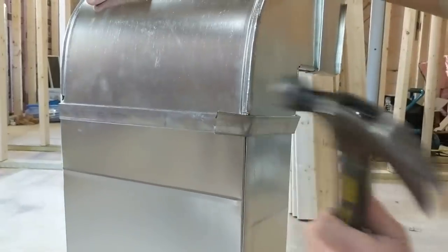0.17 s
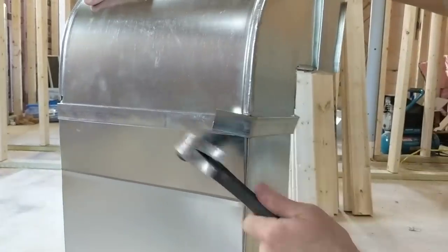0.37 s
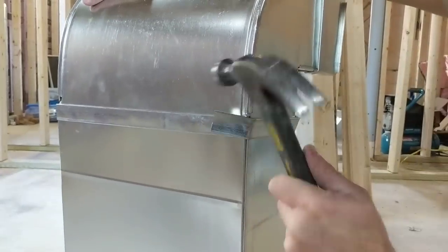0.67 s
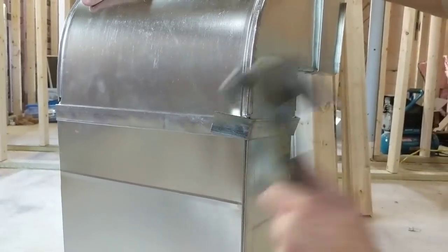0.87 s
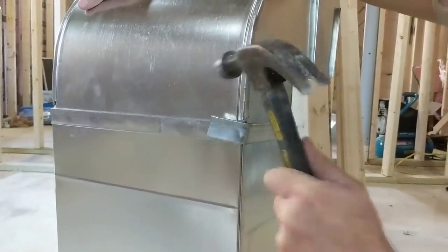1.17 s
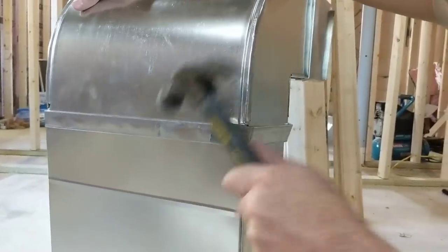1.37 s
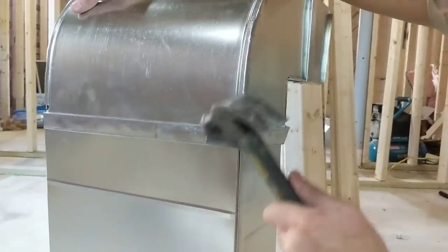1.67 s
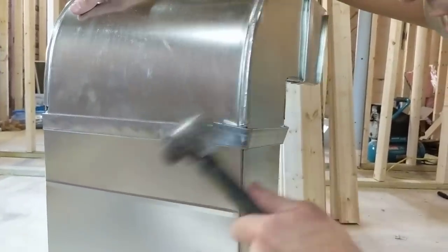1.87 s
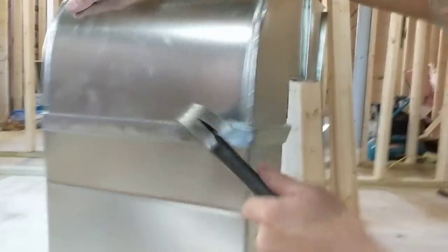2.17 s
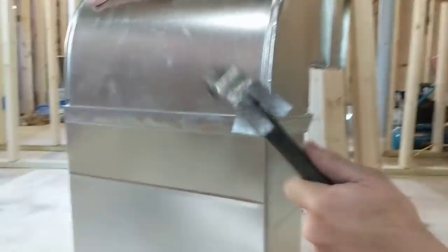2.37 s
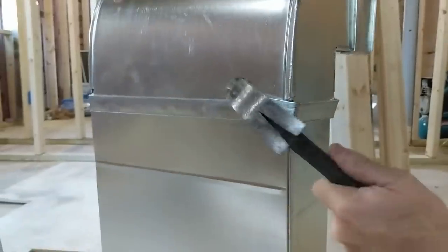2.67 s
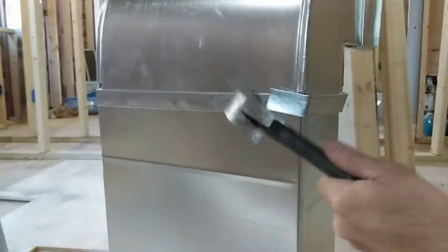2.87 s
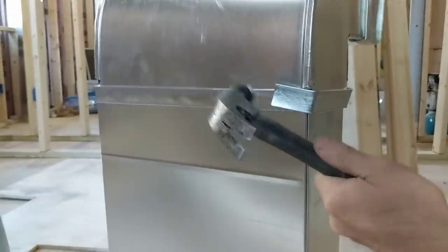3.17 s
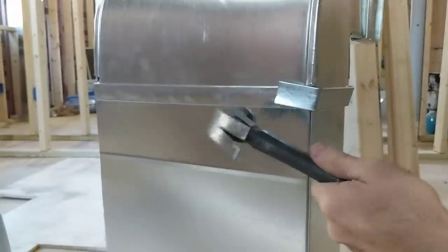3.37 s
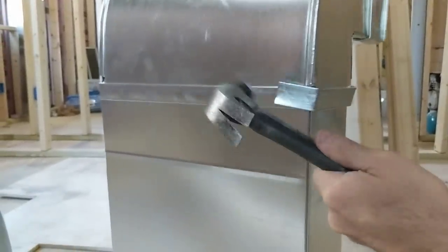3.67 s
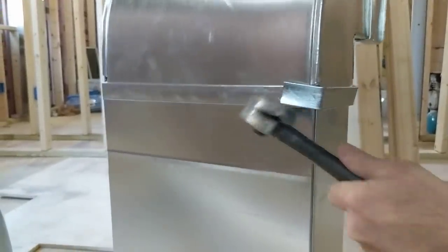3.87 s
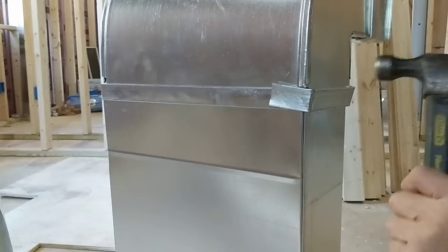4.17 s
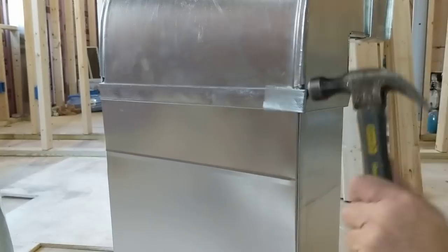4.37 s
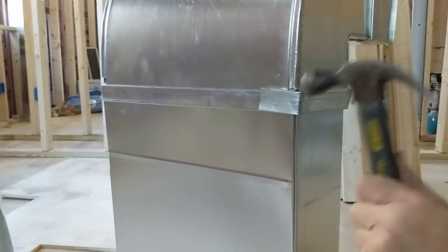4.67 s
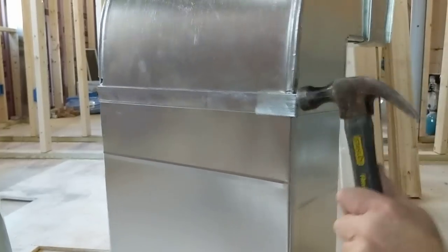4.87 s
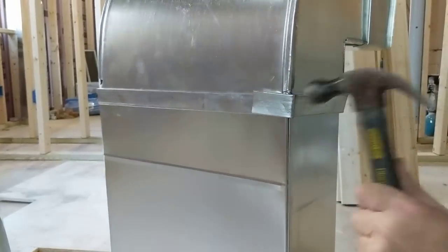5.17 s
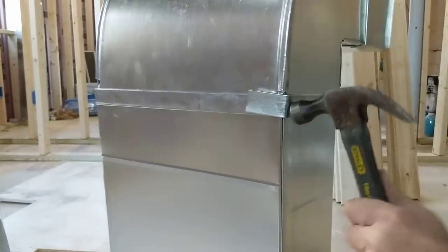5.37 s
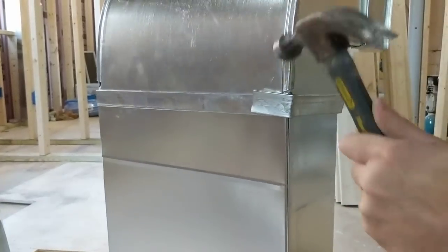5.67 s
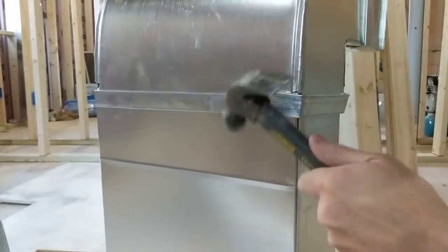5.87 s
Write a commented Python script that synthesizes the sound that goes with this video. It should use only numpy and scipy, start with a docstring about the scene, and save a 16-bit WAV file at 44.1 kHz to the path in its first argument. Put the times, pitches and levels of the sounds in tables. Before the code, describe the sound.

In a bare timber-framed room, close to the microphone, a claw hammer drives a small steel cleat onto the seam of a large sheet-metal duct. The first blow lands at about 0.1 s, then others at 0.4, 1.0, 1.4 and 1.9 s, some with a tiny double touch. Each is a hard, bright clack with a short high ping, zing and loose buzz; the hollow duct swells just behind it, booming, clanging and sizzling, with a deep thump of its wall. From 2.25 to 3.9 s the hits run quick and even, about every quarter second, pinging clearest near 3.4. After a short ringing gap, five more fall from 4.45 to 5.45 s, clear and ringing. Soft nudges and low flexing follow, then a last blow with light rattling touches at 5.9 s. Rings overlap throughout over a faint bassy room tone.

```python
"""In a bare timber-framed room, close by, a claw hammer drives a small steel cleat onto the seam of a duct.
Each blow is a hard clack of filtered noise with a brief ping, zing and buzz of the cleat.
The large sheet-metal duct then booms, clangs and sizzles away: banded noise with slow decays, plus single
panel modes and a deep thump of the wall. Between blows come soft nudges and low flexing of the duct.
The microphone chain drops deep rumble, hushes the quiet stretches, rounds off peaks and cuts the top."""
import sys
import numpy as np
from scipy import signal
from scipy.fft import rfft, irfft
from scipy.io import wavfile
from scipy.ndimage import uniform_filter1d

SR = 44100
rng = np.random.default_rng(int(sys.argv[2]) if len(sys.argv) > 2 else 0)


def file_out(sig):
    """Save sig as 16-bit WAV at sys.argv[1]."""
    # one column per channel
    cols = np.atleast_2d(sig).T
    # limit, then scale
    lim = np.clip(cols, -1, 1)
    pcm = np.round(lim * 32767).astype(np.int16)
    wavfile.write(sys.argv[1], SR, pcm)


N = 264732
TIME = np.arange(N) / SR  # s

# hammer blows; hold is how far the duct sound is held down just after the hit; levels are relative:
# (t/s, clack level/dB, ping f/Hz, ping level/dB, zing level/dB, cleat buzz level/dB,
#  duct shake level/dB, hold/dB)
BLOW_LIST = [(0.0857, -9.5, 3470, -30, -12, -23, -16, 9.5), (0.439, -14.5, 3330, -19, -8, -24, -21, 21),
             (1.0221, -15.5, 3340, -20.5, -8.5, -20, -25.5, 18),
             (1.3594, -11.5, 3130, -14.5, -21, -17, -23.5, 2),
             (1.9472, -16.5, 3200, -26, -11, -17, -21.5, 25), (2.255, -14, 3080, -19, -13, -26, -17, 16.5),
             (2.5323, -16, 3230, -17, -12, -29, -15.5, 9), (2.8428, -14.5, 3400, -22, -18, -20, -15.5, 9),
             (3.1244, -17, 3490, -12.5, -14, -22.5, -16.5, 8.5), (3.387, -14, 3630, -6, -14, -26, -22, 7),
             (3.652, -16, 3220, -15, -24, -34, -17, 12), (3.9072, -14.5, 3120, -16.5, -31, -25, -16, 11),
             (4.4456, -18.5, 3283, -10.5, -7.5, -31, -21, 0.5),
             (4.7028, -13.5, 3413, -7, -10.5, -25, -21, 2), (4.962, -15, 3330, -12, -5.5, -36, -19.5, 2),
             (5.191, -11, 3360, -10.5, -7, -25, -19, 3.5), (5.4415, -13.5, 3190, -16, -28, -23, -18, 4),
             (5.896, -16, 3200, -29, -14, -22.5, -26.5, -0.5)]


def from_db(db):
    """Amplitude factor for a level in dB."""
    return 10 ** (np.asarray(db) / 20)


def rms_one(x):
    """Scale a signal to rms 1."""
    return x / np.sqrt(np.mean(x ** 2) + 1e-20)


def at_hz(points, hz):
    """Read a curve of (f/Hz, value) points, straight over log frequency."""
    table = np.array(points)
    return np.interp(np.log(np.maximum(hz, 1)), np.log(table[:, 0]), table[:, 1])


def noise(spectrum, size):
    """Random vibration with the given spectrum; rms 1."""
    hz = np.fft.rfftfreq(size, 1 / SR)
    shaped = rfft(rng.standard_normal(size)) * from_db(at_hz(spectrum, hz))
    return rms_one(irfft(shaped, size))


def dying(age, t60):
    """Amplitude that falls 60 dB in t60 seconds."""
    return np.exp(-np.log(1000) * age / t60)


def onset(age, rise):
    """Amplitude that climbs towards 1 with time constant rise, in seconds."""
    return 1 - np.exp(-age / rise)


def add(out, s, sound):
    """Mix a sound in, starting at s seconds."""
    at = round(s * SR)
    out[at:at + len(sound)] += sound[:N - at]


def flutter(rate):
    """Random wandering: this many normal draws of spread 1 a second, joined by straight lines."""
    return np.interp(TIME * rate, np.arange(N), rng.standard_normal(N))


def follow(shake_db, usual_db, share):
    """Level of a part that is usual_db at the usual shake and gains share dB per dB of shake."""
    usual_shake_db = -19.5
    return usual_db + share * (shake_db - usual_shake_db)


def blow_shakes():
    """How each blow shakes the duct: (t/s, boom level/dB, clang level/dB, sizzle level/dB, hold/dB)."""
    boom_db, boom_follows, sizzle_db = -22, 0.4, -1.33  # sizzle is relative to the shake
    boom_per_hold = 0.13  # dB per dB: blows with more hold boom more
    rows = []
    for s, *cleat_part, shake, hold in BLOW_LIST:
        boom = follow(shake, boom_db, boom_follows) + boom_per_hold * hold
        rows.append((s, boom, shake, shake + sizzle_db, hold))
    return rows


def soft_shakes(hold_db=6.0):
    """Soft shakes of the duct, in the same columns: the softer one is, the more the boom prevails."""
    # ring left from an earlier blow, then soft nudges and low flexing of the duct: (t/s, shake level/dB)
    soft_list = [(-.2, -23), (.74, -47.5), (1.639, -29.5), (1.735, -53), (2.13, -35), (2.43, -34.5),
                 (2.71, -32.5), (3.5, -29.5), (3.558, -28.5), (4.122, -33), (4.28, -49.5), (5.63, -41),
                 (5.832, -38.5)]
    boom_db, boom_follows, sizzle_db = -22.5, 0.29, -3.5
    rows = []
    for s, shake in soft_list:
        rows.append((s, follow(shake, boom_db, boom_follows), shake, shake + sizzle_db, hold_db))
    return rows


def quiet_room(level_db=-42.5):
    """Steady background of the quiet room: noise weighted to the bass."""
    # relative noise spectrum of the room: (f/Hz, level/dB per Hz)
    room_spectrum = [(30, -16), (110, 3.5), (300, -9.5), (1000, -28), (3000, -36.5), (8000, -42),
                     (16000, -63)]
    return from_db(level_db) * noise(room_spectrum, N)


def panels(spread_db=2.5, build=0.0052):
    """Every blow sets the same panel modes ringing, each with a strength and phase of its own."""
    # clearest modes of the duct panels, levels relative to boom and clang: (f/Hz, level/dB, t60/s)
    panel_modes = [(108.5, -12.5, 1.24), (129.05, -11.5, 0.97), (153.5, -11, 0.64), (189, -10, 0.96),
                   (235, -14, 0.7), (264.7, -9, 0.85), (457, -15.5, 0.96), (512, -15, 0.77),
                   (683.5, -23, 1.4), (1030, -18.5, 0.5), (1289, -20, 0.76)]
    out, age = np.zeros(N), TIME[:SR]
    for hz, db, t60 in panel_modes:
        mode = np.exp(2j * np.pi * hz * age) * dying(age, t60) * onset(age, build)
        for s, boom, clang, sizzle, hold in blow_shakes():
            level = at_hz([(280, boom), (450, clang)], hz) + db + spread_db * rng.standard_normal()
            phase = np.exp(2j * np.pi * rng.random())
            add(out, s, from_db(level) * (mode * phase).real)
    return from_db(0.5) * out


def crowded_modes(hz, spacing_hz=20, depth_db=1.88):
    """Uneven peaks and gaps of the sheet's many modes, the same for every blow."""
    unevenness = np.interp(hz / spacing_hz, np.arange(N), rng.standard_normal(N))
    return from_db(depth_db * unevenness * np.minimum(hz / 500, 1))


def duct(release_s=0.032, release_shape=1.76, early_t60=0.29, rattle_db=0.7, wobble_db=1.5, count=19):
    """Crowded sheet modes: a quick loud shake, then a long ring in the room; lows build up later than highs."""
    # relative spectrum of the shaking duct: (f/Hz, level/dB per Hz)
    duct_spectrum = [(35, -19.5), (120, -0.5), (265, 1), (335, -7), (700, -7), (1700, -9.5), (2050, -17),
                     (3500, -10.5), (4500, -15), (6800, -18), (8000, -8.5), (9000, -25), (12500, -41.5),
                     (16000, -44)]
    # long decay of duct and room together, ahead of the noise suppressor: (f/Hz, t60/s)
    long_decay = [(60, 1.16), (200, 1.12), (550, 1.406), (1500, 0.86), (3800, 0.72), (8000, 0.77),
                  (14000, 0.4)]
    shakes = [(*row, False) for row in blow_shakes()] + [(*row, True) for row in soft_shakes()]
    hz = np.fft.rfftfreq(N, 1 / SR)
    whole = rfft(noise(duct_spectrum, N)) * crowded_modes(hz)
    centres = np.geomspace(40, 16000, count)  # overlapping bands, Hz
    coarse, out = TIME[::16], np.zeros(N)  # envelopes need only every 16th sample
    rattle = flutter(rate=340)  # the loose seam chatters against the sheet

    for k, centre in enumerate(centres):
        band = irfft(whole * np.interp(hz, centres, np.arange(count) == k), N)
        build = at_hz([(100, 0.01), (1000, 0.0017), (4000, 0.0016)], centre)  # s
        late_db = at_hz([(60, -14.0), (200, -4.5), (1000, -9.0), (3500, -9), (8000, -9.5)], centre)
        late_t60 = at_hz(long_decay, centre)
        # scales the release time of each band
        slowness = at_hz([(150, 0.79), (600, 0.84), (1500, 1.17), (4000, 0.92)], centre)
        dull_db = at_hz([(3500, 0.0), (8000, -3.5), (13000, -7.5)], centre)  # soft shakes have little treble

        power = 0
        for s, boom, clang, sizzle, hold_db, soft in shakes:
            age = np.maximum(coarse - s, 0)
            level = at_hz([(280, boom), (450, clang), (1600, clang), (2800, sizzle)], centre)
            level = level + soft * dull_db
            # the duct sound starts held down by hold_db, then comes to full level
            held_down = np.exp(-(age / (release_s * slowness)) ** release_shape)
            swell = from_db(-hold_db * held_down) * onset(age, build)
            early = dying(age, early_t60)
            late = from_db(late_db) * dying(age, late_t60)
            power = power + (from_db(level) * swell) ** 2 * (early ** 2 + late ** 2)

        rattling = rattle_db * rattle * min(centre / 3000, 1)  # fullest in the treble
        wobbling = wobble_db * flutter(rate=60) * min(1500 / centre, 1)  # fullest below 1500 Hz
        out += band * np.interp(TIME, coarse, np.sqrt(power)) * from_db(rattling + wobbling)
    return from_db(5.0) * out


def wall(size=8192):
    """A heavy blow pushes the whole wall in: a short, deep thump."""
    # relative spectrum of the duct wall flexing bodily under a blow: (f/Hz, level/dB per Hz)
    thump_spectrum = [(25, -20), (45, 0), (70, 4.5), (110, 1), (170, -14), (300, -25), (600, -59.5)]
    usual_thump_db, thump_follows = -31.5, 1.5
    out, age = np.zeros(N), TIME[:size]
    for s, *cleat_part, shake_db, hold_db in BLOW_LIST:
        thump_db = follow(shake_db, usual_thump_db, thump_follows)
        envelope = onset(age, 0.004) * dying(age, t60=0.13)
        add(out, s, from_db(thump_db) * noise(thump_spectrum, size) * envelope)
    return out


def contact(age, rise=0.00014, press=0.0013, t60=0.017, after_db=-19, after_t60=0.078):
    """The face stays on the steel for press seconds, then the cleat rings out, with a weaker, longer tail."""
    free = np.maximum(age - press, 0)
    tail = from_db(after_db) * dying(free, after_t60)
    return onset(age, rise) * (dying(free, t60) + tail)


def ringing(hz, width_hz, size):
    """A cluster of close modes, half as strong width_hz from the centre, with a nearly even envelope."""
    offset = np.fft.fftfreq(size, 1 / SR) - hz  # positive side only, so the wave is complex
    wave = np.fft.ifft(np.fft.fft(rng.standard_normal(size)) / (1 + (offset / width_hz) ** 4))
    strength = np.abs(wave)
    return np.sqrt(2) * wave.real / (strength + 0.28 * strength.mean())


def cleat(size=12000):
    """Broad clack, two bending modes (the lower shifts with where it is hit), and its buzz while loose."""
    # further touches of hammer or loose cleat just before or after a blow: (t/s, level/dB)
    contacts = [(0.457, -18), (1.0318, -19.5), (1.3626, -18), (1.3847, -17.5), (2.8835, -27), (3.3825, -16),
                (4.489, -26), (5.9046, -13.5), (5.917, -19.5)]
    # relative spectrum of the steel-on-steel clack: (f/Hz, level/dB per Hz)
    clack_spectrum = [(100, -18), (400, -9.5), (1200, -5.5), (2200, -13.5), (3200, 0.5), (4250, -4.5),
                      (5050, 1), (5800, -2.5), (6450, -5.5), (7800, 4), (9000, -14), (10500, -15.5),
                      (13000, -29.5), (16000, -34)]
    # relative spectrum of the cleat buzzing on the seam: (f/Hz, level/dB per Hz)
    buzz_spectrum = [(500, -30), (2200, -21), (3200, -2), (4200, -12.5), (5500, 0), (6600, -2), (8100, 8.5),
                     (9000, -5.5), (10500, -15), (13000, -33.5), (16000, -29.5)]
    # the ping is narrowest at small hold and widens with it, up to a limit
    narrow_hz, widens_hz_per_db, widest_hz = 76, 34, 310
    zing_hz, zing_width_hz = 7895, 380  # upper bending mode
    out, age = np.zeros(N), TIME[:size]

    for s, clack_db, ping_hz, ping_db, zing_db, buzz_db, shake_db, hold_db in BLOW_LIST:
        clack = from_db(clack_db) * noise(clack_spectrum, size)
        clack *= contact(age, rise=0.00026, press=0.0018)

        ping_width_hz = min(narrow_hz + widens_hz_per_db * max(hold_db, 0), widest_hz)
        ping = from_db(ping_db) * ringing(ping_hz, ping_width_hz, size)
        ping *= contact(age, rise=0.0007, press=0.003, t60=0.017, after_db=-18, after_t60=0.25)

        zing = from_db(zing_db) * ringing(zing_hz, zing_width_hz, size)
        zing *= contact(age, rise=0.00025, press=0.0014, t60=0.011, after_db=-22.5, after_t60=0.1)

        clatter = from_db(1.8 * flutter(rate=730)[:size])
        buzz = from_db(buzz_db) * noise(buzz_spectrum, size) * clatter
        buzz *= onset(age, 0.0059) * dying(age, t60=0.24)
        add(out, s, clack + ping + zing + buzz)

    for s, db in contacts:
        touch = contact(age, rise=0.000067, press=0.0012, t60=0.014, after_db=-15, after_t60=0.058)
        add(out, s, from_db(db) * noise(clack_spectrum, size) * touch)
    return out


def scene():
    """Quiet room, duct and cleat, heard from close by, in one channel."""
    return (quiet_room() + panels() + duct() + wall() + cleat())[None]


def suppress(x, split_hz=420, threshold_db=-45, slope=0.28, deepest_db=9):
    """Noise suppressor: what lies above the bass sinks further once it has become quiet."""
    bass = signal.sosfiltfilt(signal.butter(3, split_hz, fs=SR, output="sos"), x)
    upper = x - bass
    power = uniform_filter1d(upper ** 2, size=900)  # mean over about 20 ms
    level_db = 10 * np.log10(np.maximum(power, 1e-12))
    gain_db = np.clip(slope * (level_db - threshold_db), -deepest_db, 0)
    return bass + upper * from_db(gain_db)


def record(dry, low_cut_hz=44, cutoff_hz=15900, ceiling=0.72):
    """Deepest rumble is lost, quiet treble hushed, the loudest peaks are rounded off and the top is cut."""
    low_cut = signal.butter(3, low_cut_hz, "high", fs=SR, output="sos")
    hushed = suppress(signal.sosfilt(low_cut, dry))
    rounded = hushed / (1 + (hushed / ceiling) ** 6) ** (1 / 6)
    top_cut = signal.ellip(10, 0.1, 90, cutoff_hz, fs=SR, output="sos")
    return signal.sosfilt(top_cut, rounded)


dry = scene()
out = record(dry)
file_out(out)
```